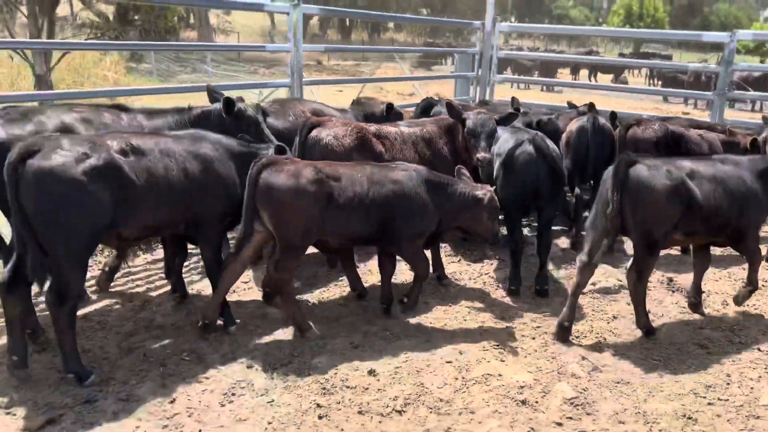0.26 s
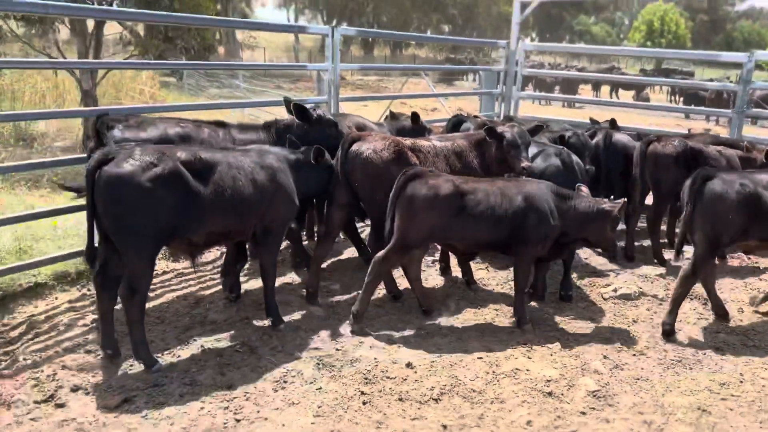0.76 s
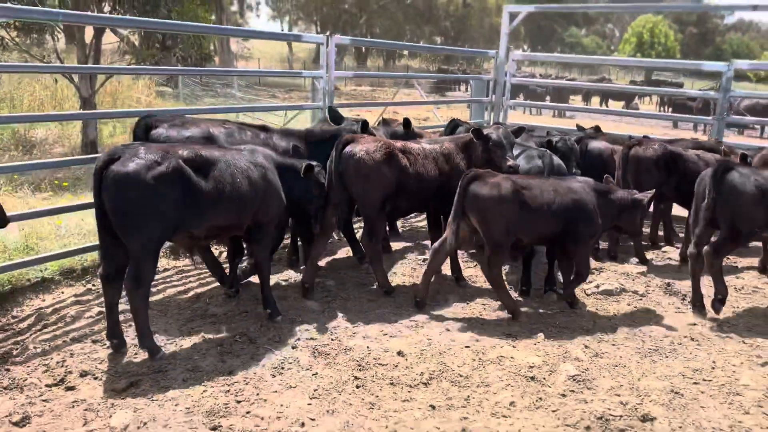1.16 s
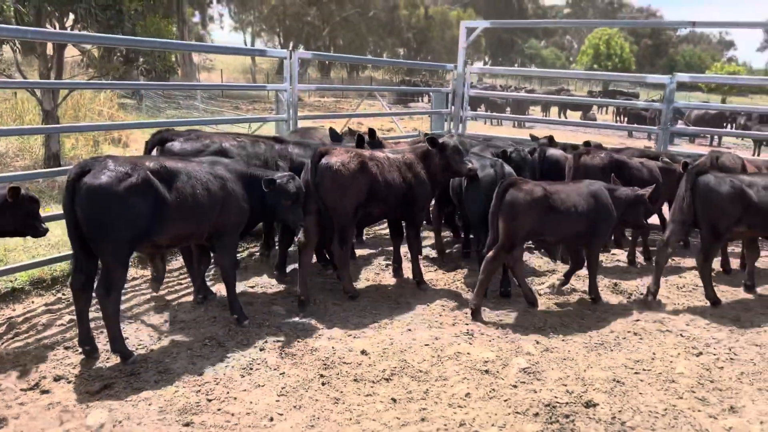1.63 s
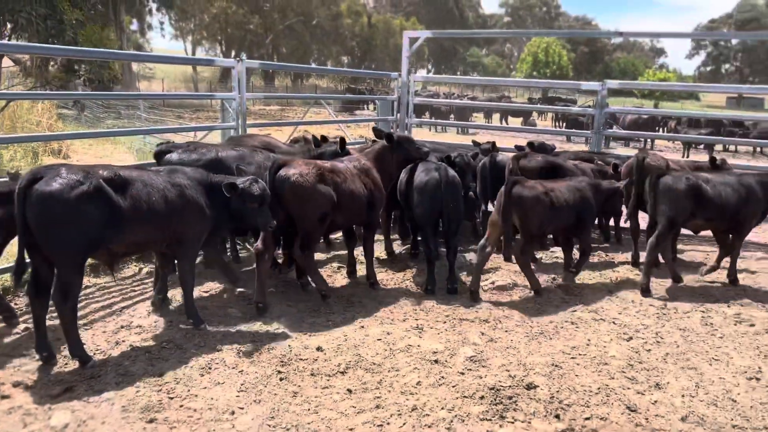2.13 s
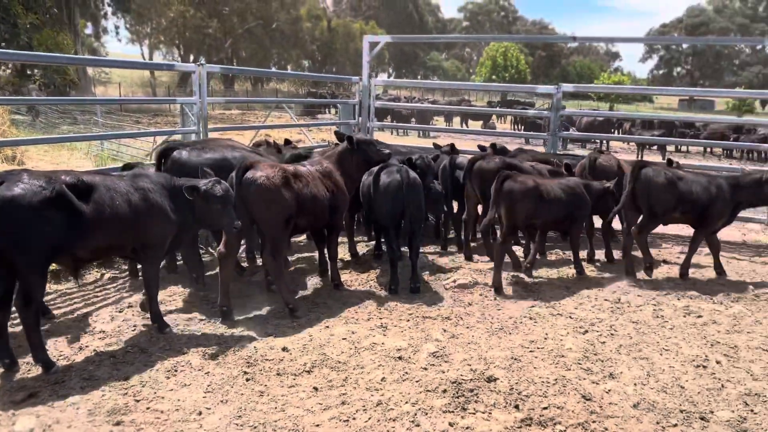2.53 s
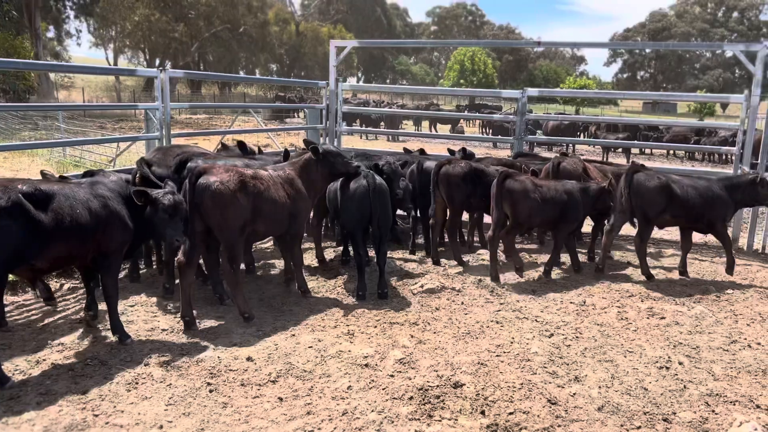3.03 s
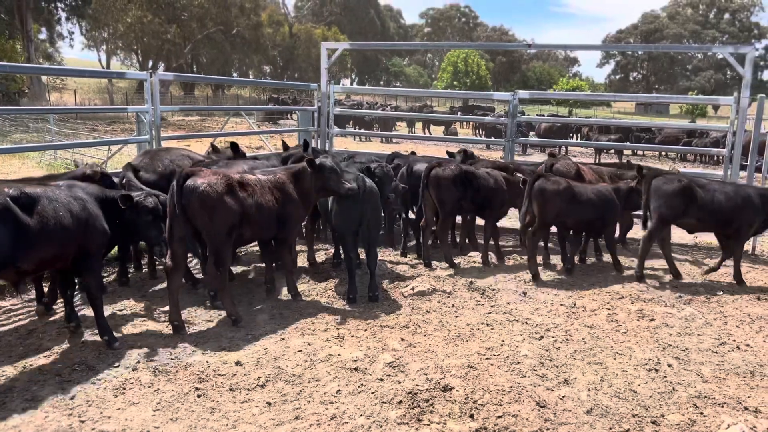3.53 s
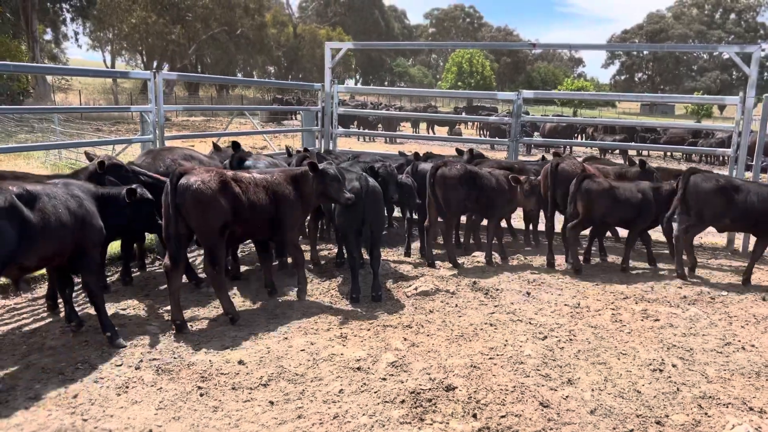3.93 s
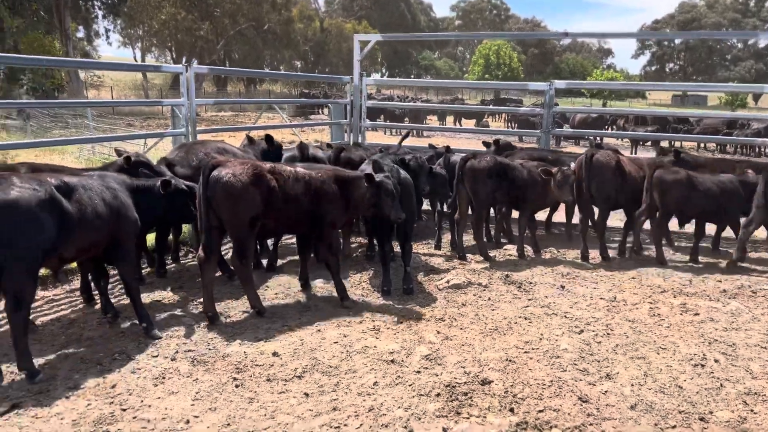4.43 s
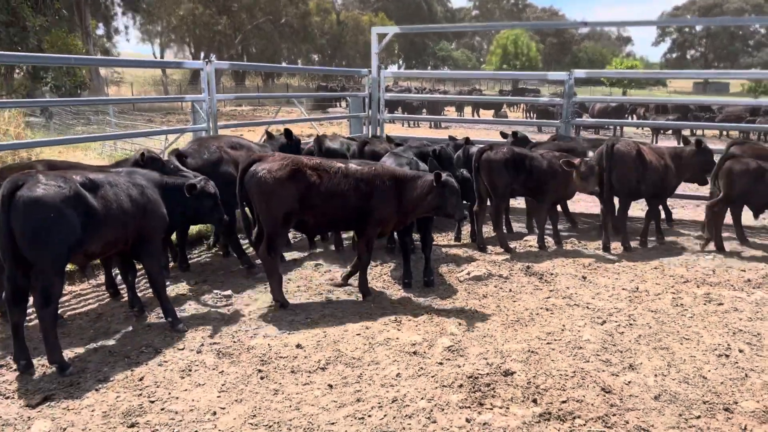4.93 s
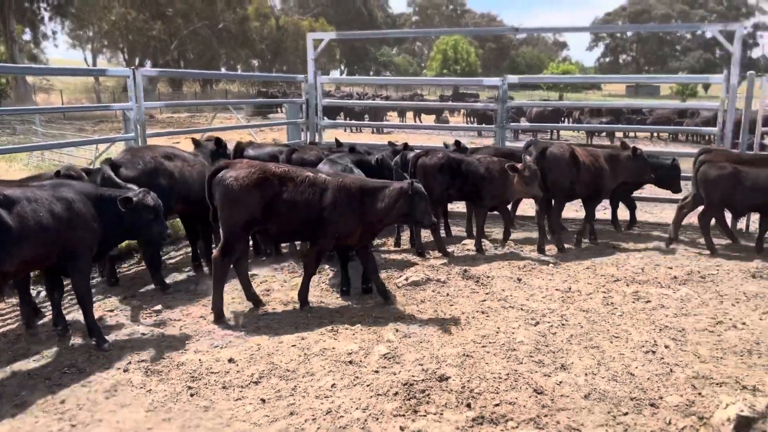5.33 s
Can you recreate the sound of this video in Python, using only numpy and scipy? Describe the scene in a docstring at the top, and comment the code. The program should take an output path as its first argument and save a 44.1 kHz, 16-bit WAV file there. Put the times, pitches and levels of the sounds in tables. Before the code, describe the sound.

A herd of calves calls outdoors, close to a handheld stereo microphone buffeted by wind. Short shrill and crying voices come first, then gravelly low ones and a smooth longer bawl. After brief hoarse grunts, two low bawls swell over one another, the last strongest. Dry dirt hisses underfoot, hooves knock dully, grit snaps, and soft tree wash lies beneath.

```python
"""An open steel-railed yard: calves bawl one after another, and at the end two long bawls overlap.
Their voices are fold pulses and noisy puffs of air, shaped by throat and nose; many turn hoarse as they fade.
Wind is low filtered noise in spells and buffets. Hooves scuff dry dirt in patches of hiss and crunch,
snap grit and knock dully, as short bursts of coloured noise. A steel latch chinks once.
A soft wash of trees and distant cattle lies underneath."""
import sys
import numpy as np
from scipy import signal
from scipy.fft import rfft, irfft
from scipy.io import wavfile
from scipy.ndimage import uniform_filter1d

SR = 44100
rng = np.random.default_rng(int(sys.argv[2]) if len(sys.argv) > 2 else 0)


def transcribe(signal):
    """Save signal, clipped to [-1, 1], as a 16-bit WAV file at the path in sys.argv[1]."""
    frames = np.atleast_2d(signal).T
    limited = np.clip(frames, -1, 1)
    pcm = np.round(limited * 32767).astype(np.int16)
    wavfile.write(sys.argv[1], SR, pcm)


N = 246078
TIME = np.arange(N) / SR


def amp(db):
    """Decibels to gain."""
    return 10 ** (np.asarray(db) / 20)


def evened(x):
    """Scales to rms 1."""
    return x / np.sqrt(np.mean(x ** 2) + 1e-20)


def read(points, hz):
    """Joins (Hz, value) points on a log-frequency axis."""
    f, value = np.transpose(points)
    return np.interp(np.log(hz + 1), np.log(f + 1), value)


def add(mix, s, sound):
    """Adds a stereo sound at time s."""
    part = mix[:, max(round(s * SR), 0):][:, :sound.shape[-1]]
    part += sound[..., :part.shape[1]]


def panned(x, balance_db):
    """Left and right copies that differ in level; a positive balance favours the left."""
    return x * amp([[balance_db / 2], [-balance_db / 2]])


def colour(x, points, size=4096, skirt_db=20):
    """Causal filter with the given spectrum, falling by skirt_db an octave outside it; the result has rms 1."""
    hz = abs(np.fft.fftfreq(size, 1 / SR)) + 1
    octaves_outside = abs(np.log2(hz / np.clip(hz, points[0][0], points[-1][0])))
    gain_db = np.maximum(read(points, hz) - skirt_db * octaves_outside, -100)
    # minimum phase: the Hilbert transform of the log gain supplies the phase
    spectrum = np.exp(signal.hilbert(np.log(amp(gain_db))).conj())
    taps = np.fft.ifft(spectrum).real[:size // 2] * np.hanning(size)[size // 2:]
    return evened(np.apply_along_axis(lambda v: signal.oaconvolve(v, taps)[:len(v)], -1, x))


def wander(count, rate_hz):
    """Smooth random drift of rms 1, its spectrum fading out around rate_hz."""
    f = np.fft.rfftfreq(count, 1 / SR)
    return evened(irfft(rfft(rng.standard_normal(count)) * np.exp(-(f / rate_hz) ** 2), count))


def noise_pair(count, likeness):
    """Left and right noise that share a part."""
    a, b = rng.standard_normal((2, count))
    c = np.clip(likeness, -1, 1)
    return np.array([a, c * a + np.sqrt(1 - c ** 2) * b])


# How long the yard's echo lasts. Each row: frequency in Hz, time to fall 60 dB in seconds.
YARD = [(150, 0.058), (700, 0.94), (1800, 0.66), (4000, 0.81), (9000, 0.015)]


def yard(x, early_s=0.025, far_db=-13):
    """Quick scatter off ground, rails and bodies, then a faint tail from the trees."""
    t = TIME[:SR]
    sparse = (rng.random(SR) < .1) * (t > .002)
    taps = noise_pair(SR, 0.2) * sparse * (np.exp(-t / early_s) + amp(far_db))
    hz, t, z = signal.stft(taps, SR, nperseg=256)
    tail = signal.istft(z * amp(-60 * t / read(YARD, hz)[:, None]), SR)[1]
    return signal.fftconvolve(x[None], tail / np.linalg.norm(tail[0]), axes=1)


ONSET_DB, FADE_DB = -8.5, -5  # level offsets at the start of the attack and the end of the release
BREAK_POWER, BREAK_ROUGH, MOST_ROUGH = 2.02, 0.59, 0.89  # the voice turns rough late in the release
CLOSE_S = 0.049  # the last of the air runs out over this time


def effort(attack_s, hold_s, release_s, level_db, swell_db, roughness):
    """One push of air sets in, swells and gives way: time, level in dB, roughness, release progress."""
    t = np.arange(0, attack_s + hold_s + release_s, 1 / SR)
    to_go = np.clip(1 - t / (attack_s + hold_s), 0, 1)
    release = np.clip((t - attack_s - hold_s) / release_s, 0, 1)
    broken = release ** BREAK_POWER
    onset = np.clip(1 - t / attack_s, 0, 1)
    db = level_db + ONSET_DB * onset - swell_db * to_go + FADE_DB * broken
    db = db + 20 * np.log10(np.clip((t[-1] - t) / CLOSE_S, .01, 1))
    rough = np.clip(roughness + BREAK_ROUGH * broken, 0, MOST_ROUGH)
    return t, db, rough, release


def arch(t, release, start_hz, top_hz, end_hz, climb_s):
    """Pitch eases from start to top, then bends ever faster toward its end during the release."""
    climbed = np.sin(np.pi / 2 * np.minimum(t / climb_s, 1)) ** 2
    return start_hz + (top_hz - start_hz) * climbed + (end_hz - top_hz) * release ** 2


# Resonance of the nose. Each row: frequency in Hz, relative level in dB.
NOSE = [(90, -13.5), (170, 2.5), (240, 6.5), (330, -5), (470, -26)]


def voice(t, hz, level_db, hum_db, rough, jaw, throats, second, jitter=0.0022, rough_jitter=0.0253,
          doubling=0.93, beat_depth=0.8, shimmer_db=1.5, puff_turns=0.95, top_hz=7000):
    """Vocal fold pulses and puffs of air leave through the nose and through a mouth shaped by the jaw."""
    pitch_jitter = (jitter + rough_jitter * rough) * wander(len(t), 75.0)
    turns = np.cumsum(hz * (1 + pitch_jitter)) / SR
    harmonics = range(1, int(top_hz / hz.min()))
    folds = sum(np.cos(2 * np.pi * k * turns) * (k * hz < top_hz) for k in harmonics)
    if second is not None:  # a second tone beats against the folds and makes every harmonic throb
        at, second_hz, strength = np.transpose(second)
        strength = np.interp(t, at, strength, left=0, right=0)
        second_turns = np.cumsum(np.interp(t, at, second_hz)) / SR
        throb = 1 + beat_depth * strength * np.cos(2 * np.pi * (second_turns - turns))
        folds = (folds + strength * np.cos(2 * np.pi * second_turns)) * throb
    folds = folds * np.sqrt(2 * hz / top_hz)  # even power whatever the number of harmonics
    folds = folds * (1 + doubling * rough * np.cos(np.pi * turns))  # strained folds beat strong, then weak
    puffs = evened((0.24 + np.exp(-(turns % 1) / puff_turns)) * rng.standard_normal(len(t)))
    drive = ((1 - rough) * folds + rough * puffs) / np.hypot(1 - rough, rough)
    # crossfade between neighbouring throat shapes
    jaw = np.clip(jaw, 0, len(throats) - 1)
    shapes = (np.maximum(1 - abs(jaw - k), 0) * colour(drive, throat) for k, throat in enumerate(throats))
    mouth = amp(level_db) * sum(shapes)
    nose = amp(hum_db) * colour(drive, NOSE)
    fade = np.clip(np.minimum(t - t[0], t[-1] - t) / 0.0011, 0, 1)
    return (mouth + nose) * fade * amp(shimmer_db * wander(len(t), 37.0))


# Throat resonances, some for several jaw positions. Each row: frequency in Hz, relative level in dB.
SHRILL_THROAT = [(400, -11), (590, -11), (760, -9.5), (900, -15), (1150, -10.5), (1450, -23), (1740, -10),
                 (2000, -19.5), (2310, -20.5), (2550, -18), (2900, -39), (4700, -46)]
SHRILL_WIDE = [(300, -21), (560, -3), (700, -11.5), (850, 3), (980, -7.5), (1130, 0), (1400, -14),
               (1700, -10.5), (2000, -18), (2300, -23.5), (3600, -38)]
MOAN_THROAT = [(500, -8.5), (1250, -6), (1600, -9.5), (2900, -20), (3600, -27)]
DISTANT_THROAT = [(600, -2), (1170, 0.5), (1750, -7), (2050, -16), (2400, 6.5), (3200, -16), (4500, -10)]
HOARSE_THROAT = [(380, -5.5), (600, -5.5), (760, -11.5), (970, 0), (1080, -5), (1290, 2), (1600, -19),
                 (2500, -23)]
CRY_THROAT = [(500, -27), (600, -23), (665, -4), (800, 4.5), (900, -4.5), (1330, -3.5), (1520, -1),
              (1750, -20), (2050, -22), (2350, -30), (2750, -26), (3300, -23.5), (3800, -45)]
GROWL_THROAT = [(500, 2.5), (900, -1.5), (1080, 1), (1280, 8.5), (1500, -2), (1720, 4), (2200, -11.5),
                (3000, -2), (3800, -37), (4900, -10.5), (5500, -31)]
LONG_THROAT = [(250, -2.5), (410, 10), (600, -26), (780, 2.5), (850, 4.5), (1000, -9), (1250, -7.5),
               (1600, -8.5), (2500, -12.5), (3300, -23.5), (4600, -31), (5300, -18), (5900, -37)]
LONG_WIDE = [(250, -6), (400, 8), (600, -19), (790, 4), (1000, -21), (1190, 11), (1350, -9), (1600, -12),
             (3300, -30)]
LOW_SHUT = [(400, -9), (560, -7.5), (660, -1.5), (740, 5.5), (820, -11), (1000, -15), (1130, -7),
            (1400, -23.5), (1660, -6), (1850, -8.5), (2200, -35.5), (4000, -39)]
LOW_OPEN = [(400, -16.5), (500, -7), (710, -14), (815, 5), (930, -9), (1090, -1.5), (1340, -18),
            (1520, -4.5), (1680, -13.5), (1950, -10), (2200, -21), (2450, -18), (2680, -44.5),
            (2950, -29.5), (3450, -33.5), (4000, -47.5)]
NEAR_HALF = [(400, -13), (550, 2.5), (700, -14), (950, -3.5), (1080, -22), (1200, 5), (1340, -18),
             (1490, -16), (1750, -7), (2000, -23), (2300, -20), (2650, -29), (2980, -22), (4200, -57)]
NEAR_OPEN = [(400, -16.5), (820, -11.5), (985, 1.5), (1150, -11.5), (1310, -14), (1480, -4), (1640, -13),
             (1810, -9.5), (2100, -20.5), (2700, -21.5), (2980, -24), (3300, -37), (3640, -31), (4200, -40)]
NEAR_WIDE = [(350, -7), (530, -0.5), (705, -7), (880, 1.5), (1410, -1), (1590, -17), (1765, -14.5),
             (1950, -21), (2120, -18.5), (2500, -31), (2850, -29), (3300, -44), (3750, -36), (4400, -34.5),
             (6300, -49.5)]
# Second tones inside a voice. Each row: time in seconds, pitch in Hz, strength as a ratio.
SHRILL_TONE = [(0, 767, 0.13), (.09, 763.5, 0.071), (.17, 884, .25)]
CRY_TONE = [(1.01, 743, 0.89), (1.379, 735.4, 0.62), (1.46, 716, 1.3), (1.499, 680, 0.26)]
# The voices by name. Each entry: throats in jaw order, second tone or none, lead at the left ear in ms,
# left-over-right balance in dB, yard echo in dB.
VOICES = {"shrill": ([SHRILL_THROAT, SHRILL_WIDE], SHRILL_TONE, 0.23, -5, -7.5),
          "distant": ([DISTANT_THROAT], None, 0.15, -1, 0.93), "moaning": ([MOAN_THROAT],
          None, -0.05, -1.2, 1), "crying": ([CRY_THROAT], CRY_TONE, -0.13, -2.3, -5),
          "growling": ([GROWL_THROAT], None, 0.27, 1, -8), "long": ([LONG_THROAT, LONG_WIDE],
          None, 0.24, -3.3, -13), "hoarse": ([HOARSE_THROAT], None, 0.2, -0.76, -4),
          "low": ([LOW_SHUT, LOW_OPEN], None, 0.19, -3, -8), "near": ([NEAR_HALF, NEAR_OPEN, NEAR_WIDE],
          None, 0.22, -3.3, -7)}


def heard(name, t, hz, level_db, hum_db, rough, jaw):
    """One voice placed by the delay and level between the ears, with the echo of the yard."""
    throats, second, lead_ms, balance_db, echo_db = VOICES[name]
    x = voice(t, hz, level_db, hum_db, rough, jaw, throats, second)
    ms = 1000 * np.arange(len(x)) / SR
    out = amp(echo_db) * yard(x)
    out[:, :len(x)] += [x, np.interp(ms - lead_ms, ms, x)]
    return panned(out, balance_db)


# Calls and parts of calls from the herd; one calf may pass through several voices.
# Each row: voice, start in seconds, nose hum in dB at the loudest point, effort, arch.
# Effort: attack, hold and release in seconds, level in dB, swell before the release in dB, roughness 0-1.
# Arch: start, top and end pitch in Hz, time from start to top in seconds.
CALLS_IN_HERD = [("shrill", 0, -50, (.002, .06, .125, -31.5, -1, .09), (590, 574, 495, .07)),
                 ("shrill", .125, -46, (.025, .015, .06, -41.5, 0, .5), (288, 282, 250, .02)),
                 ("distant", .32, -66, (.06, .04, .09, -59, 0, .6), (590, 598, 570, .08)),
                 ("moaning", .25, -55, (.05, 0.63, 0.3, -63, 2, 0.25), (86, 96, 91, .65)),
                 ("hoarse", .87, -50, (.05, .035, 0.04, -50, 2, 0.15), (196, 226, 226, .11)),
                 ("crying", 1.01, -52, (.02, .335, .155, -40, 5, .27), (612, 668, 535, .17)),
                 ("hoarse", 1.475, -48, (.02, .01, .085, -47, -1, .3), (215, 186, 105, .04)),
                 ("growling", 2.2, -44, (.17, 0.13, 0.15, -49.5, 4.5, 0.12), (66, 126, 130, .37)),
                 ("hoarse", 2.46, -45, (0.12, 0.64, .2, -55, -5, .65), (85, 125, 132, .33)),
                 ("hoarse", 3.31, -44, (.05, .06, .13, -48.5, 1, .4), (135, 141, 85, .1)),
                 ("hoarse", 3.61, -45, (0.05, .1, .14, -53, 0, 0.4), (119, 113, 72, .1))]
# Pitch of the three near bawls. Each row: time in seconds, pitch in Hz.
LONG_PITCH = [(2.56, 378), (2.61, 386), (2.67, 401), (2.78, 416), (2.92, 424), (3.05, 422), (3.15, 415),
              (3.26, 417), (3.33, 389), (3.37, 345)]
LOW_PITCH = [(4.03, 74.5), (4.18, 75), (4.28, 72.5), (4.43, 81.5), (4.55, 90.8), (4.6, 91.6), (4.65, 95),
             (4.8, 99.8), (4.9, 101.9), (5.0, 106.5), (5.19, 109), (5.32, 117)]
NEAR_PITCH = [(4.62, 100), (4.7, 108), (4.8, 119.8), (4.9, 130), (4.96, 137), (5.0, 145.5), (5.1, 161),
              (5.2, 169.3), (5.3, 176), (5.35, 177.3), (5.42, 172.5), (5.46, 148), (5.5, 122), (5.58, 90)]
# Effort of the near bawls. Each row: time in seconds, mouth level in dB, nose hum in dB,
# jaw position counted in throats (held within the voice's set), roughness 0-1.
LONG_EFFORT = [(2.56, -54, -76, 0.22, .2), (2.62, -46.5, -60, 0.08, .06), (2.68, -41.5, -51, 0, .05),
               (2.9, -42.5, -48.5, 0, .08), (3.04, -44.5, -53, 0.55, .16), (3.235, -42.5, -64, 0.37, .1),
               (3.28, -38.5, -58, 1, .05), (3.33, -40, -50, 1, .12), (3.368, -53, -55, 1, .6)]
LOW_EFFORT = [(3.96, -64, -70, 0, 0.1), (4.04, -52, -48, 0, 0.15), (4.188, -54, -48, 0, 0.15),
              (4.26, -59.5, -47, 0, 0.2), (4.38, -46.5, -46.5, 0, 0.05), (4.537, -43, -39, 0, 0.16),
              (4.558, -36, -37.5, 1, 0.08), (4.72, -33, -34.5, 1, 0.02), (4.92, -35, -38, 1, 0.09),
              (5.062, -44.5, -34, 1, 0.26), (5.3, -47, -37, 1, 0.33), (5.58, -50, -49, 1, 0.4)]
NEAR_EFFORT = [(4.62, -63, -34.5, 0.23, 0.11), (4.76, -42.5, -34, 0.6, 0.033),
               (4.87, -38, -30.5, -1.8, 0.044), (4.93, -36.5, -31, -0.5, .06),
               (5.02, -36, -31, 0.14, 0.036), (5.1, -33.5, -30, 1.47, 0.071), (5.19, -33.5, -34, 1.3, 0.11),
               (5.3, -30, -31.5, 2.03, .04), (5.41, -29.5, -33.5, 2, 0.057),
               (5.462, -34.5, -26.5, 0.7, 0.6), (5.52, -41.5, -33.5, 1.5, 0.27), (5.58, -51, -37, 0, 0.48)]
# The three near bawls. Each row: voice, effort table, pitch table.
CLOSE_BAWLS = [("long", LONG_EFFORT, LONG_PITCH), ("low", LOW_EFFORT, LOW_PITCH),
               ("near", NEAR_EFFORT, NEAR_PITCH)]
HUM_FOLLOWS = 0.92  # dB of nose hum for each dB of mouth level, in the herd
GAPE_SHARE = 0.32  # share of a release in which the jaw moves by one throat, in the herd


def calves():
    """Short pushes of air from within the herd, and three near bawls among and after them."""
    out = np.zeros((2, N))
    for name, start, hum_db, push, pitch in CALLS_IN_HERD:
        t, level_db, rough, release = effort(*push)
        hum_db = hum_db + HUM_FOLLOWS * (level_db - level_db.max())
        hz = arch(t, release, *pitch)
        add(out, start, heard(name, start + t, hz, level_db, hum_db, rough, release / GAPE_SHARE))
    for name, push, pitch in CLOSE_BAWLS:
        at, *controls = np.transpose(push)
        t = np.arange(at[0], at[-1], 1 / SR)
        level_db, hum_db, jaw, rough = (np.interp(t, at, control) for control in controls)
        hz = np.interp(t, *np.transpose(pitch))
        add(out, t[0], heard(name, t, hz, level_db, hum_db, np.clip(rough, 0, 1), jaw))
    return out


# Colour of the wind's low rumble. Each row: frequency in Hz, relative level in dB.
WIND_COLOUR = [(30, -13.5), (55, 4.5), (95, -1), (140, -10), (220, -14), (350, -29)]
# Spells of breeze. Each row: start in seconds, end in seconds, level in dB before gusting.
BREEZES = [(0, 1.363, -37), (2.463, 2.8, -40), (3.308, 5.307, -38)]
BREEZE_RISE_DB_PER_S, BREEZE_FALL_DB_PER_S, CALM_DB = 128, 60, -61
# Single buffets. Each row: middle in seconds, level in dB, upper edge in Hz, half length in seconds.
BUFFETS = [(0.114, -26.5, 124, 0.029), (.315, -24, 147, 0.017), (0.417, -26, 168, 0.011),
           (0.963, -29, 144, 0.019), (0.999, -26.5, 315, 0.0057), (1.013, -18.5, 150, 0.012),
           (2.503, -32.5, 226, 0.0075), (3.331, -29.5, 130, 0.016), (3.486, -30.5, 110, 0.0093),
           (3.668, -33.5, 100, 0.028), (4.217, -26, 104, 0.027), (4.242, -27, 205, 0.0043)]


def wind(steady_s=0.092, gust_db=2):
    """Low eddies on the microphone come in spells, with single harder buffets."""
    eddies = colour(noise_pair(N, 0.87), WIND_COLOUR)
    local_power = uniform_filter1d((eddies ** 2).mean(0), int(steady_s * SR))
    eddies = eddies / np.sqrt(local_power + 1e-9)
    spells = []
    for start, end, db in BREEZES:
        rise_db = BREEZE_RISE_DB_PER_S * np.maximum(start - TIME, 0)
        fall_db = BREEZE_FALL_DB_PER_S * np.maximum(TIME - end, 0)
        spells.append(db - rise_db - fall_db)
    breeze_db = np.maximum(np.max(spells, axis=0), CALM_DB)
    out = eddies * amp(breeze_db + gust_db * wander(N, 12))
    t = TIME[:SR // 5] - .1
    for s, db, edge_hz, half_s in BUFFETS:
        shape = np.exp(-(t / half_s) ** 2 / 2)
        push = shape * colour(noise_pair(len(t), 0.92), [(70, 0), (edge_hz, 0)])
        add(out, s + t[0], amp(db) * evened(push) * np.sqrt(np.mean(shape ** 2)))
    return out


# Colour of dry dirt. Each row: frequency in Hz, relative level in dB.
SCUFF_COLOUR = [(800, 20), (2000, 9.5), (3900, 4.5), (5000, 6.5), (6400, 3.5), (7400, -2), (9000, -6.5),
                (10500, -31.5), (12000, -3.5), (15500, -18.5)]
# Dragging feet. Each row: middle in seconds, level in dB before the trim level_db,
# half length in seconds, brightest frequency in Hz.
SCUFFS = [(0.008, -53.5, 0.23, 4330), (1.162, -59.5, 0.49, 6600), (2.503, -59, 0.086, 4750),
          (3.03, -57.5, 0.25, 6360), (3.973, -57, 0.13, 5800), (4.068, -53, 0.075, 4870),
          (5.115, -56, 0.68, 5780)]
STANDING_DB = -66  # the herd's rustle between scuffs, before the same trim


def shuffle(level_db=1, grains_per_s=700, spread_db=11.0, grain_share=0.24, balance_db=2.0,
            flutter_db=1, patchy_db=2.9, peak_db=4, peak_width_hz=380):
    """Dry dirt hisses and crunches in patches under many feet; each scuff swells with its brightest band."""
    size = amp(spread_db * np.minimum(rng.exponential(1, N), 4.3))
    grains = size * (rng.random(N) < grains_per_s / SR)
    crunch = evened(grains * noise_pair(N, 0.23))
    dirt = colour(noise_pair(N, 0.053) + grain_share * crunch, SCUFF_COLOUR)
    hz, t, z = signal.stft(dirt, SR, nperseg=512)
    power = amp(STANDING_DB) ** 2
    for s, db, half_s, peak_hz in SCUFFS:
        band = 1 + amp(peak_db) ** 2 * np.exp(-((hz[:, None] - peak_hz) / peak_width_hz) ** 2)
        power = power + amp(db) ** 2 * band * np.exp(-((t - s) / half_s) ** 2)
    # blotches of louder and softer sound across frequency and time
    patches = uniform_filter1d(rng.standard_normal(power.shape), size=7, axis=0)
    patches = evened(uniform_filter1d(patches, size=12, axis=1))
    dirt = signal.istft(z * np.sqrt(power) * amp(patchy_db * patches), SR)[1][:, :N]
    return panned(dirt, balance_db) * amp(level_db + flutter_db * wander(N, 23))


# Colour of the outdoor wash. Each row: frequency in Hz, relative level in dB.
AIR = [(24, -22.5), (40, 2.5), (200, -4.5), (340, -11.5), (715, -10), (857, -19), (1500, -20.5),
       (3050, -29.5), (3960, -53.5)]


def air(level_db=-60.5, swell_db=1.4):
    """The soft outdoor wash of trees and distant cattle: coloured noise with a gently wavering level."""
    return colour(noise_pair(N, 0.35), AIR) * amp(level_db + swell_db * wander(N, 6.1))


# Hooves striking the dirt. Each row: start in seconds, level in dB before the trim knock_db,
# centre in Hz, time to fall 60 dB in seconds.
KNOCKS = [(.292, -27, 260, .06), (2.088, -41, 900, 0.021), (2.111, -41.5, 795, 0.041),
          (2.231, -33, 650, 0.06), (2.325, -21, 200, .06), (3.459, -28, 1050, .03),
          (3.914, -25, 900, 0.035)]
# Grit snapping under hooves. Each row: start in seconds, level in dB before the trim tick_db.
TICKS = [(0.871, -52), (1.302, -54), (2.046, -50), (2.9185, -52), (3.338, -54), (3.481, -48.5),
         (4.4192, -44), (5.464, -35.5)]


def hooves(tick_t60=0.03, tick_db=-6, knock_db=-6):
    """Sharp snaps of grit and dull, dead knocks: coloured noise that dies away at once."""
    out, t = np.zeros((2, N)), TIME[:SR // 6]
    for s, db in TICKS:
        snap = colour(noise_pair(len(t), 0.38), [(1000, -18), (4000, 21.5), (7000, 19.5), (14000, 4.5)])
        add(out, s, snap * amp(db + tick_db - 60 * t / tick_t60))
    for s, db, hz, t60 in KNOCKS:
        blow = colour(noise_pair(len(t), 0.46), [(hz / 2, -2), (hz, 0), (0.96 * hz, -7), (3 * hz, -26)])
        add(out, s, blow * amp(db + knock_db - 60 * t / t60))
    return out


# Colour of a steel latch or chain. Each row: frequency in Hz, relative level in dB.
LATCH = [(2550, -26), (2870, 2), (3000, -1.5), (3650, -17), (4200, -15), (5500, -14), (6500, -27)]
CLINK_S, CLINK_DB, CLINK_T60 = 0.677, -49, .15  # start in s, level in dB, time to fall 60 dB in s


def rail(echo_db=-10):
    """A calf bumps the steelwork once and a loose latch chinks: bright noise dying away, with an echo."""
    out, t = np.zeros((2, N)), TIME[:SR // 4]
    chink = colour(noise_pair(len(t), .6), LATCH) * amp(CLINK_DB - 60 * t / CLINK_T60)
    add(out, CLINK_S, chink)
    add(out, CLINK_S, amp(echo_db) * yard(chink[0]))
    return out


def scene():
    """The yard with everything in it."""
    return calves() + wind() + shuffle() + air() + hooves() + rail()


EDGE_HZ = 15800  # upper limit of the sound


def record(dry):
    """A steep low-pass filter takes off the highest treble."""
    taps = signal.firwin(511, EDGE_HZ, window=("kaiser", 9), fs=SR)
    return signal.oaconvolve(dry, taps[None], "same")


dry = scene()
out = record(dry)
transcribe(out)
```